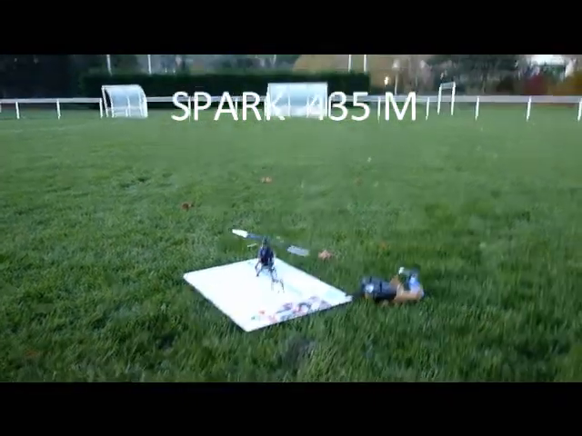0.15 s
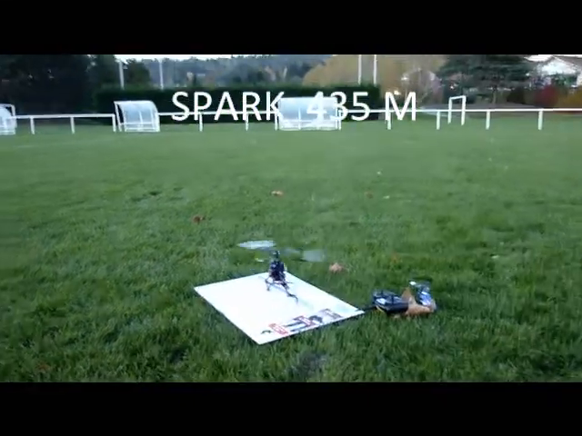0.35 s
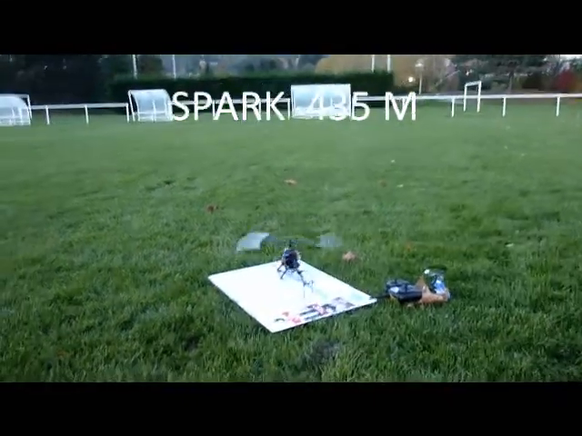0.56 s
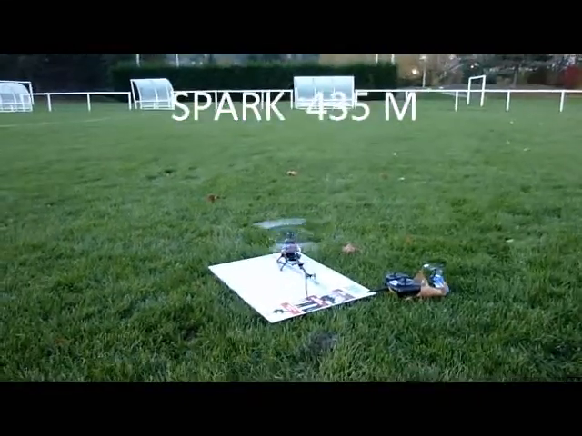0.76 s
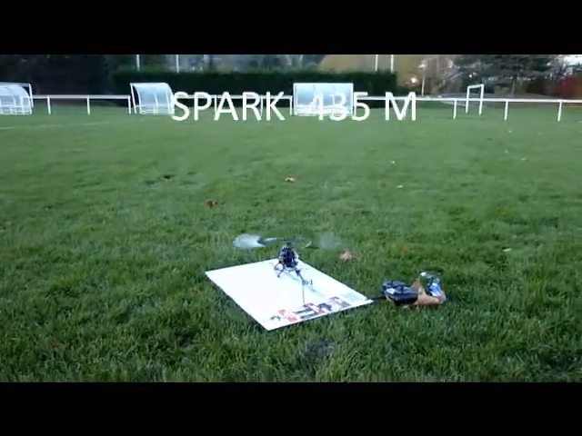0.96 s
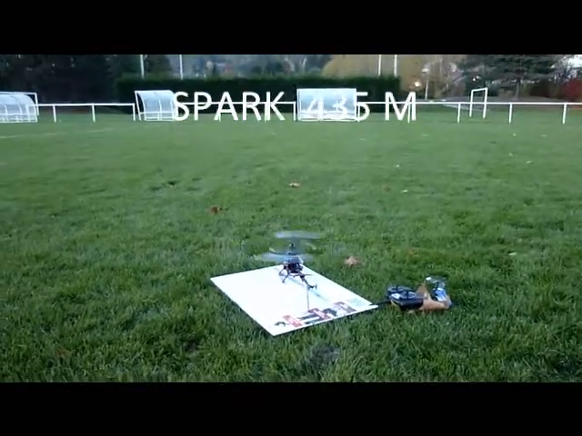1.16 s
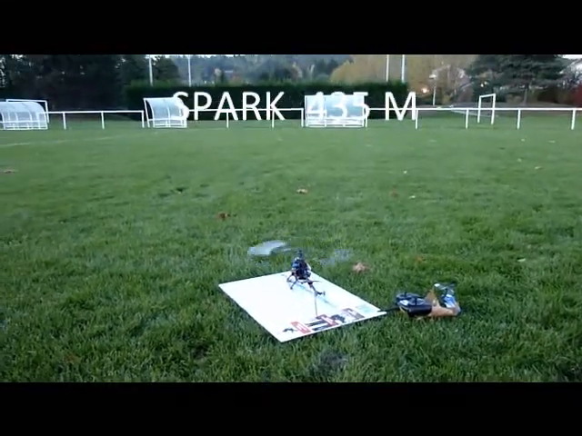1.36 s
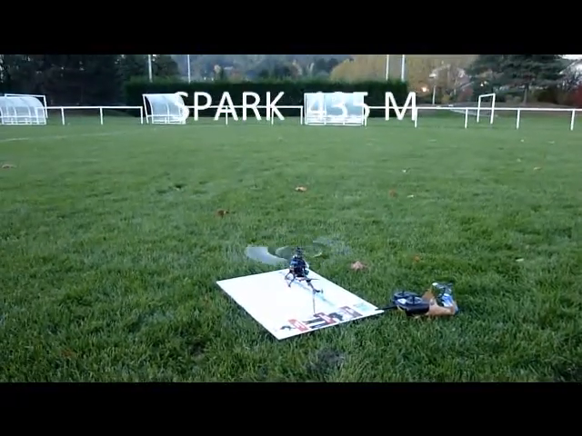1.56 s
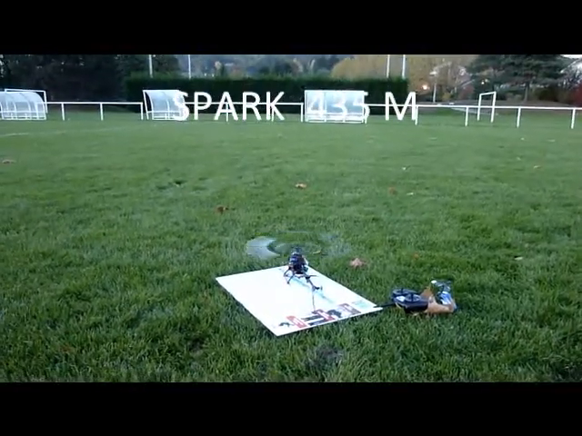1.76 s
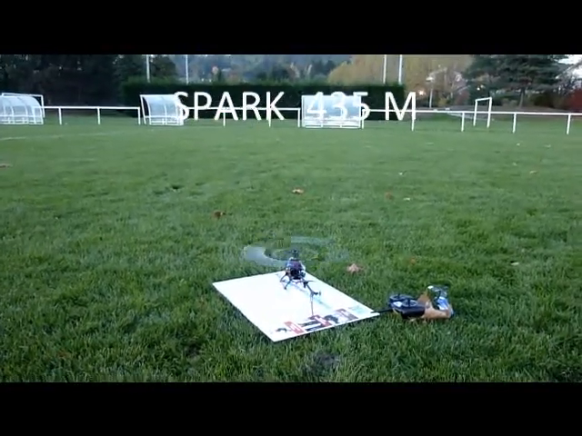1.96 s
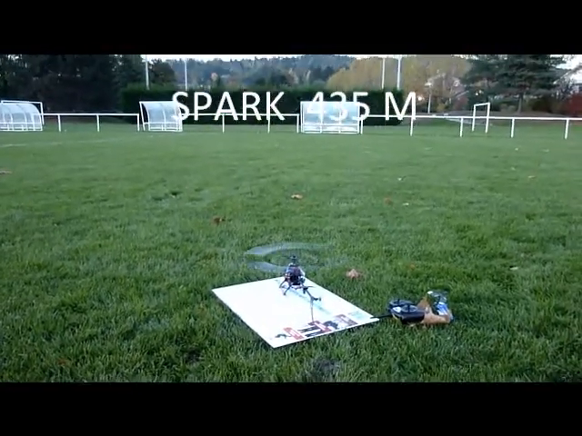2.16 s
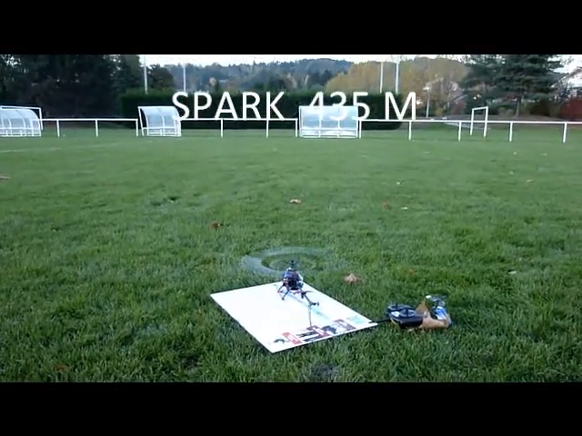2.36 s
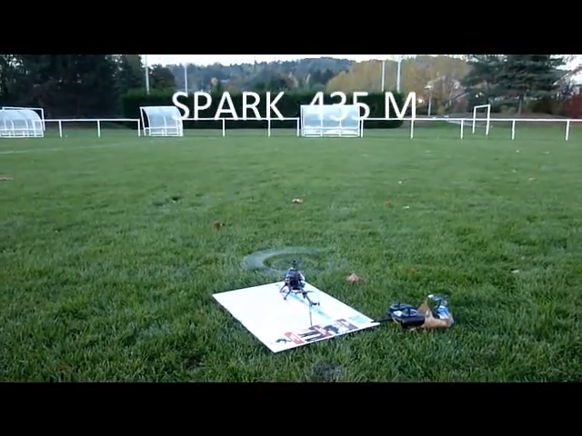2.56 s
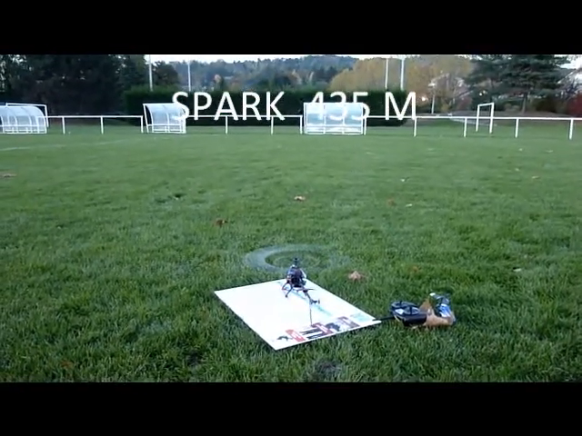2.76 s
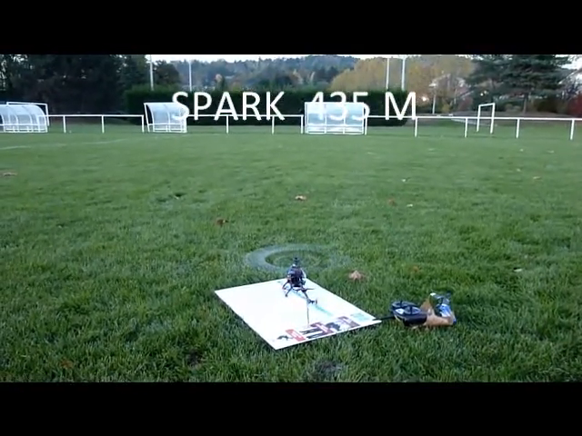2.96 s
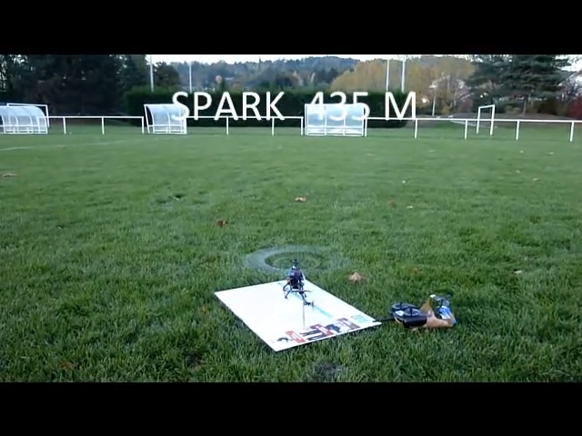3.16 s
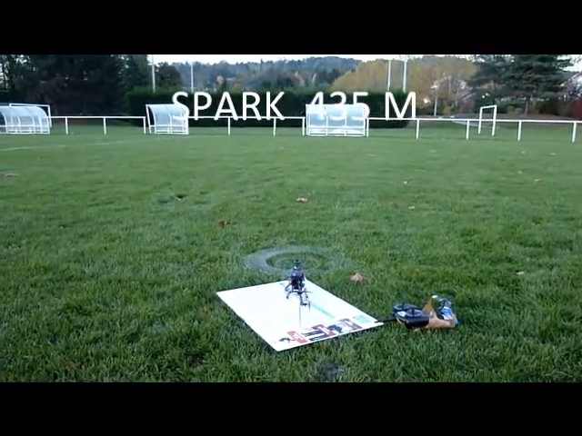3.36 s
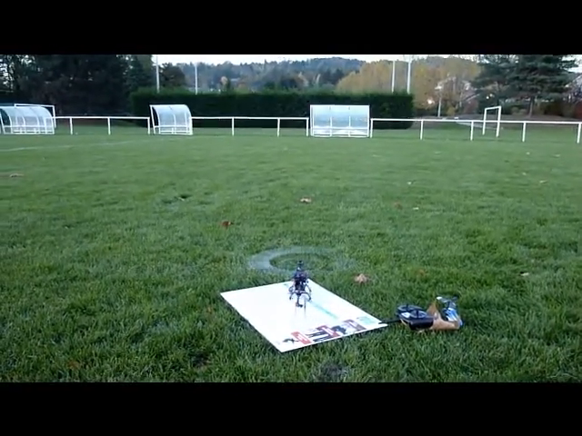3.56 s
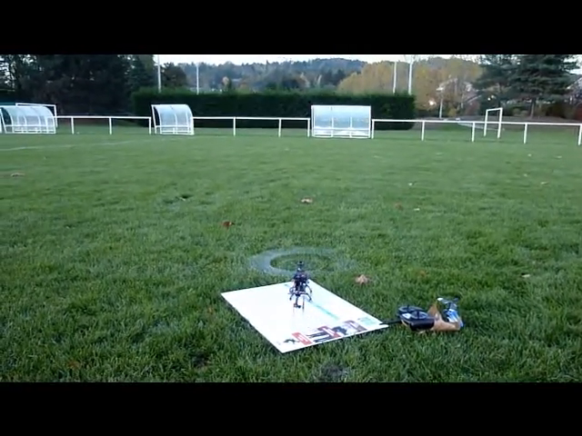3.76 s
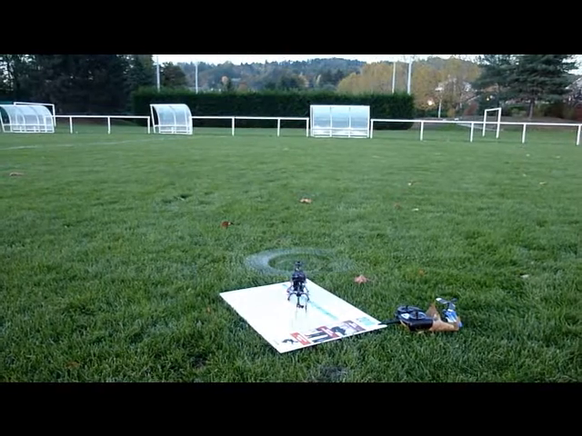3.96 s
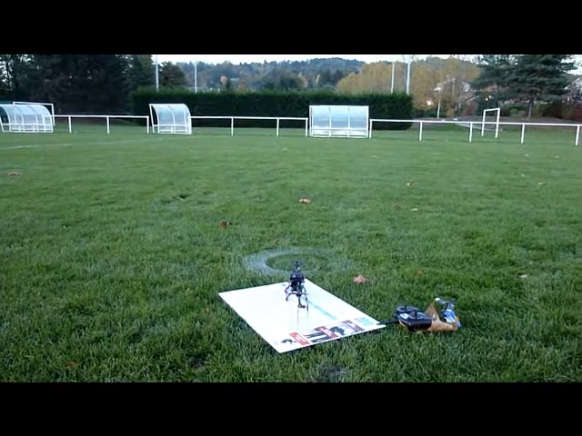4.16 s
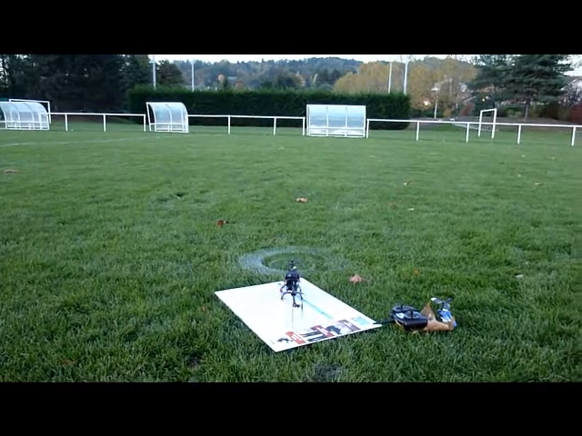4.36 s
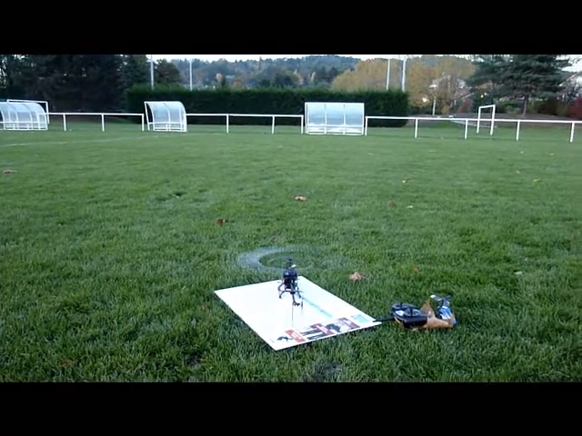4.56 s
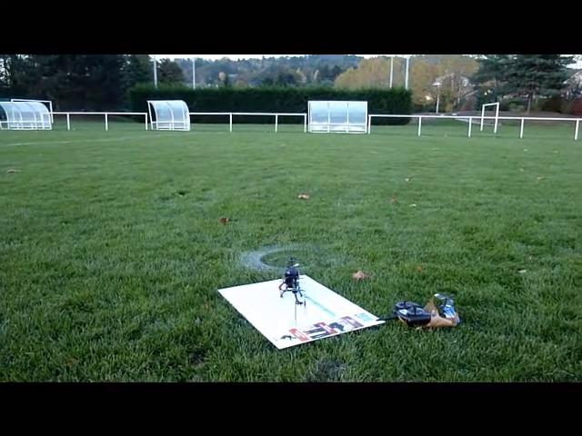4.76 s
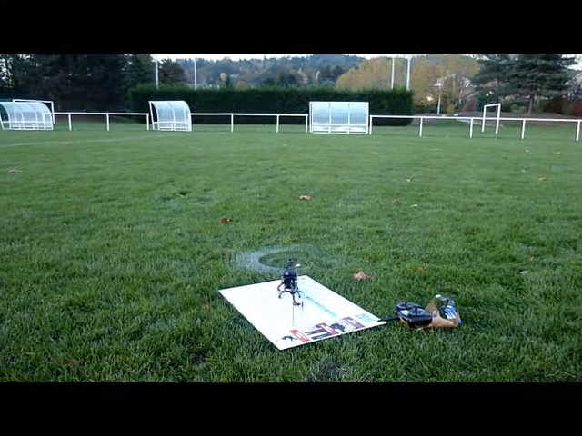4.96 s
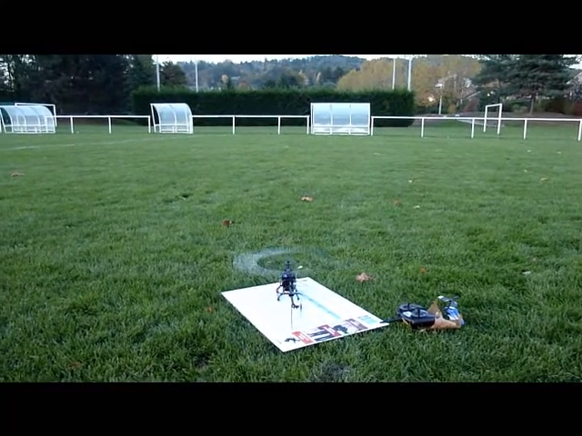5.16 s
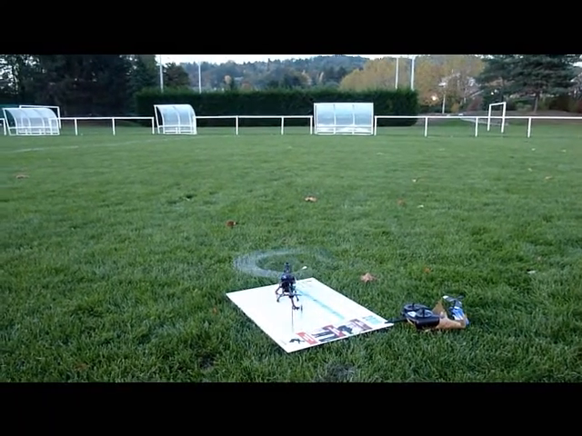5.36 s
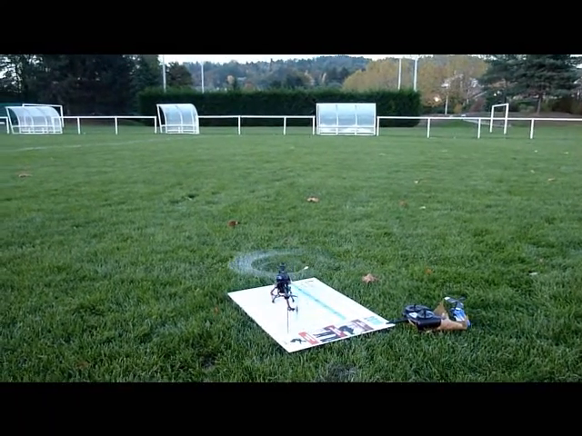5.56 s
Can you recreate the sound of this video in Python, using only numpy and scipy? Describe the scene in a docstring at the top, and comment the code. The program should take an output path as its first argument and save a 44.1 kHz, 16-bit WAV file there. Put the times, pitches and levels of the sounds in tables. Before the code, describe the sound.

In an open grassy field with faint traffic far off, a small electric model helicopter starts on a board. Tiny ticks and loose dry knocks come first, then a low gear whine wavers and climbs. Thin electronic tones slide downwards and fade around two seconds. The whine swells through resonances into a piercing, raspy pitch with fluttering blade swish, still rising at the end. One camera microphone a few steps away, narrow band, no deep bass.

```python
"""Small electric helicopter spooling up

It stands on a board in a field, a few steps from a camera whose single microphone hears it all.
The speed controller ticks and sings downwards while the pinion's whine climbs through the gearbox's resonances.
Gears rasp, motor and bearings sizzle, and the two blades swish, each following one motor speed; traffic passes far off.
The camera cuts two notches and keeps a narrow band."""
import sys
import numpy as np
from scipy import signal
from scipy.fft import rfft, irfft, next_fast_len
from scipy.io import wavfile
from scipy.ndimage import uniform_filter1d, map_coordinates

SR = 44100
rng = np.random.default_rng(int(sys.argv[2]) if len(sys.argv) > 2 else 0)


def dump(signal):
    """Clip the signal to [-1, 1] and save it as 16-bit WAV at the path in sys.argv[1]."""
    limited = np.clip(np.atleast_2d(signal).T, -1, 1)
    pcm = np.round(limited * 32767).astype(np.int16)
    wavfile.write(sys.argv[1], SR, pcm)


N = 251370
TIME = np.arange(N) / SR

# Far traffic's rumble and drone. Each row: frequency in Hz, relative level in dB.
TRAFFIC_SPECTRUM = [(20, -55.5), (40, -39.5), (70, -16.5), (110, -8.5), (160, 1.5), (280, 0), (360, -10),
                    (600, -16), (1500, -39)]
# Tyre rush across the field. Each row: frequency in Hz, relative level in dB.
TYRE_SPECTRUM = [(150, -31.5), (380, -10.5), (600, -7), (1000, 3), (1300, 0), (1900, -7.5), (2400, -7),
                 (3300, -19), (4200, -14), (6000, -37), (8000, -43)]
# Air torn by the blades. Each row: frequency in Hz, relative level in dB.
WASH_SPECTRUM = [(100, -30), (350, -23.5), (460, 0), (570, 6), (700, 4), (820, -18.5), (1050, 5.5),
                 (1350, -16), (1650, 1.5), (2000, -21), (4000, -35.5)]
# Hiss of sliding gear teeth. Each row: frequency in Hz, relative level in dB.
RASP_SPECTRUM = [(300, -24), (1000, -8.5), (1600, -12.5), (2000, -5), (2500, -9.5), (3000, 4.5),
                 (3500, 5.5), (4100, 3), (4550, 8), (4900, -5.5), (5600, -8.5), (8000, -36.5)]
# Hiss of the motor and bearings. Each row: frequency in Hz, relative level in dB.
SIZZLE_SPECTRUM = [(4000, -26), (5300, -9), (5650, -8.5), (5900, 6.5), (6100, 7), (6500, 3), (6900, -1.5),
                   (7200, -6.5), (7600, -14), (7900, -44)]
# Rise and fall of that hiss. Each row: time in seconds, level in dB.
SIZZLE_LEVEL = [(0.08, -68.5), (0.2, -49.5), (0.65, -43), (0.88, -51), (0.94, -43), (2.0, -44), (3.3, -40),
                (4.1, -37), (4.7, -38), (5.2, -48)]
# Current kicks in the windings. Each row: start in seconds, relative level in dB.
KICKS = [(0.105, -36.5), (0.1278, -33.5), (0.1672, -33.5), (0.172, -33), (0.18, -48.5), (0.193, -42),
         (0.9197, -26)]
# Knocks from slack in the drive and blade grips. Each row: start in seconds, relative peak level in dB.
KNOCKS = [(0.321, -32), (0.556, -34), (0.585, -23), (0.597, -32), (0.667, -30), (0.695, -33), (0.719, -27),
          (1.035, -34), (1.087, -32)]
# What a knock rings with. Each row: frequency in Hz, mean relative level in dB, 60 dB decay time in seconds.
CHASSIS_MODES = [(592, 2, 0.036), (720, 0, 0.012), (900, 2, 0.029), (1500, -7, .012), (2280, -11.5, 0.0085)]
# How well the frame radiates. Each row: frequency in Hz, gain in dB.
FRAME_RADIATION = [(250, -18.5), (440, 1), (560, -1.5), (790, 3), (1080, 5), (1650, -3.5), (2000, -7),
                   (2500, -3.5), (3700, -4.5), (4200, 3), (4500, 6.5), (4850, -6), (5300, -8.5),
                   (6100, 4.5), (6850, 3), (7800, -21)]
# How well the motor's can radiates. Each row: frequency in Hz, gain in dB.
CAN_RADIATION = [(4500, -38.5), (5300, -19), (5800, 1.5), (6600, 1), (7300, -1), (7700, -13.5)]
# Tones beating below the switching frequency. Each row: multiple of the motor turn, relative level in dB.
SIDEBANDS = [(9, -17.5), (12, -29), (15, -20), (17, -13), (18, 5), (19, -11.5), (21, -8), (24, -11),
             (25, -22), (26, -18.5), (27, 0), (30, -7.5)]
# Motor speed before smoothing. Each row: time in seconds, speed in motor turns a second.
MOTOR_SPEED = [(0.0, 3.0), (0.09, 4.7), (0.47, 32.1), (0.61, 48.7), (0.72, 50.8), (0.9, 65.7), (0.99, 60.2),
               (1.14, 66.0), (1.33, 64.2), (1.6, 67.5), (1.81, 80.1), (2.26, 123.8), (2.46, 135.2),
               (2.78, 147.7), (3.3, 169.9), (3.71, 190.2), (3.97, 210.6), (4.12, 218.9), (4.39, 224.4),
               (4.7, 242.4), (5.12, 255.2), (5.7, 266.0)]
# Shaft vibration. Each row: multiple of the motor turn, relative level in dB.
SHAFT_ORDERS = [(2, -57.5), (3, -57), (4, -64.5), (5, -73), (6, -64), (7, -71.5), (8, -69), (9, -62),
                (10, -55), (11, -51), (12, -48), (14, -46), (15, -55.5), (16, -49), (17, -77.5), (18, -48),
                (19, -50.5), (20, -52.5), (21, -54.5), (22, -61), (23, -51), (24, -58), (25, -47.5),
                (27, -50), (28, -47.5), (29, -49), (30, -54.5), (31, -56.5), (32, -52.5), (33, -54),
                (34, -59), (35, -58), (36, -49), (37, -61), (38, -48.5), (39, -51), (40, -47), (42, -59.5)]
# Tail drive gears. Each row: multiple of the motor turn, relative level in dB.
TAIL_ORDERS = [(5.777, -55.5), (6.13, -58.5), (11.2, -56), (11.555, -42.5), (12.645, -45), (13.355, -46.5),
               (14.8, -53.5), (16.13, -59.5), (17.33, -61)]
# Resonances where the whine swells. Each row: centre in Hz, width at half amplitude in Hz, peak gain in dB.
GEARBOX_RESONANCES = [(640, 220, -47), (1040, 230, -42.5), (1650, 250, -39.5), (2453, 280, -38.5),
                      (2760, 440, -38), (3105, 260, -35), (3577, 100, -34.5), (4045, 306, -23.5),
                      (4470, 370, -21.5), (5410, 330, -25), (5980, 480, -23.5), (6600, 660, -19.5)]
# Harmonics of the pinion's tooth rate. Each row: multiple, relative level in dB, phase smear in cycles.
TOOTH_HARMONICS = [(1, 0.5, 0.037), (2, -11, 0.036), (3, -26.5, 0.27), (4, -28, 0.34)]
# Notches in the camera's sound. Each row: centre in Hz, width in Hz.
CAMERA_NOTCHES = [(3000, 990), (5230, 480)]

PINION_TEETH, MAIN_GEAR_TEETH, TAIL_RATIO = 13, 130, 0.355
SWITCH_HZ, CAMERA_RATE_HZ, TOP_HZ = 7813, 16000, 7900
# Motor turns a second: the reference, where the teeth begin to run steadily, where the frame begins to shake.
FULL_SPEED, RATTLE_UNTIL, SHAKE_FROM = 250, 126, 132
# The rasp grows with speed, then eases from EASE_S on.
RASP_DB, RASP_DB_PER_OCTAVE, EASE_S, EASE_DB_PER_S = -38.5, 7, 3.6, 2
# The controller's song swells to a peak, then sinks away.
SONG_DB, SONG_PEAK_S, SONG_SWELL_DB_PER_S, SONG_DROP_DB, SONG_RELEASE_S = -43, 2.067, 8, 21, 0.058
# The blades take on pitch and bite the air, then the wash settles.
WASH_DB, BITE_S, BITE_ATTACK_S, BITE_DB, BITE_SETTLE_S = -46, 4.53, 0.13, 4, 1.1
# Far traffic: levels when nearest, moment when nearest, times to cover its own distance.
RUMBLE_DB, DRONE_DB, NEAREST_S, RUMBLE_PASS_S, DRONE_PASS_S = -51.5, -55, 2, 2.02, 0.87


def amp(db):
    """Decibels to gain."""
    return np.exp(np.asarray(db) * (np.log(10) / 20))


def unit(x):
    """Scale to rms 1."""
    return x / np.sqrt(np.mean(x ** 2) + 1e-20)


def along(points, hz):
    """Gain read from (Hz, dB) points on a log frequency axis."""
    f, db = np.transpose(points)
    return amp(np.interp(np.log(hz + 1), np.log(f), db))


def curve(rows):
    """One value per sample from (seconds, value) rows."""
    seconds, values = np.transpose(rows)
    return np.interp(TIME, seconds, values)


def since(start_s):
    """Seconds since a moment, zero before it."""
    return np.maximum(TIME - start_s, 0)


def wobble(rate):
    """A smooth random curve, rate knots a second."""
    knots = rng.standard_normal(int(N * rate / SR) + 4)
    coarse = TIME[::32]
    return np.interp(TIME, coarse, map_coordinates(knots, [coarse * rate]))


def filtered(x, response):
    """x shaped by a response of frequency."""
    size = next_fast_len(N + SR // 2)
    hz = np.fft.rfftfreq(size, 1 / SR)
    return irfft(rfft(x, size) * response(hz), size)[:N]


def noise(spectrum):
    """Coloured noise of rms 1."""
    return unit(filtered(rng.standard_normal(N), lambda hz: along(spectrum, hz)))


def tone(cycles):
    """A sine of rms 1 with a random starting phase."""
    fraction = (cycles - np.floor(cycles)).astype(np.float32)
    return np.sin(2 * np.pi * (fraction + rng.random())) * np.sqrt(2)


def runout(turns, count):
    """A wheel's unevenness, repeating with each of its turns."""
    return unit(sum(tone(k * turns) for k in range(1, count + 1)))


def outdoors(tyres_db=-44.5, drone_hz=185):
    """Far traffic: steady tyre rush, and rumble and one droning engine that come near and recede."""
    def nearness(pass_s):
        return 1 / np.hypot(1, (TIME - NEAREST_S) / pass_s)

    tyres = amp(tyres_db + 1.2 * wobble(2.4)) * noise(TYRE_SPECTRUM)
    rumble = amp(RUMBLE_DB + 0.63 * wobble(3.6)) * nearness(RUMBLE_PASS_S) * noise(TRAFFIC_SPECTRUM)
    drone_level = amp(DRONE_DB + 1.5 * wobble(10)) * nearness(DRONE_PASS_S) ** 2.4
    drone = drone_level * tone(drone_hz * TIME + 0.11 * wobble(14))
    return tyres + rumble + drone


def start_up(kick_db=-4, kick_t60=0.014, crack_db=-3, crack_t60=0.033):
    """Current kicks tick in the motor, and the drive knocks as it takes up its slack."""
    out = np.zeros(N)
    t = np.arange(SR // 8) / SR
    tick = noise(SIZZLE_SPECTRUM)
    crack = noise(FRAME_RADIATION[:8] + [(4000, -32.5)])

    def piece(x):
        return np.roll(x, rng.integers(N))[:len(t)]

    for start_s, db in KICKS:
        out[round(start_s * SR):][:len(t)] += amp(db + kick_db - 60 * t / kick_t60) * piece(tick)
    for start_s, db in KNOCKS:
        knock = amp(crack_db - 60 * t / crack_t60) * piece(crack)
        for hz, mode_db, t60 in CHASSIS_MODES:
            decay = amp(mode_db + rng.normal(0, 2.2) - 60 * t / t60)  # each knock strikes the modes differently
            knock += decay * np.sin(2 * np.pi * hz * t)
        out[round(start_s * SR):][:len(t)] += amp(db + 1) * knock / np.abs(knock).max()
    # Such small parts radiate little bass.
    return signal.sosfilt(signal.butter(3, 350, "highpass", fs=SR, output="sos"), out)


def blades(speed, turns, swish=0.33, chop=0.11, buzz=0.17, gust_db=-0.1, half_speed=40):
    """Air torn by the two blades swells with each pass; the motor's shake makes it buzz."""
    attack = np.minimum(since(BITE_S) / BITE_ATTACK_S, 1)
    bite = attack * np.exp(-since(BITE_S + BITE_ATTACK_S) / BITE_SETTLE_S)
    level = amp(WASH_DB + BITE_DB * bite + gust_db * wobble(28))
    rotor = turns * PINION_TEETH / MAIN_GEAR_TEETH
    passing = unit(1 + swish * runout(rotor, count=3) + chop * tone(2 * rotor) + buzz * tone(turns))
    return level * speed / (speed + half_speed) * passing * noise(WASH_SPECTRUM)


def friction(speed, turns, motor_pulsing=0.046, rotor_pulsing=0.082):
    """Sliding teeth and bearings hiss, pulsing with the turns of motor and rotor."""
    octaves = np.log2(speed / FULL_SPEED)
    rasp_db = RASP_DB + RASP_DB_PER_OCTAVE * octaves - EASE_DB_PER_S * since(EASE_S)
    rasp = amp(rasp_db) * noise(RASP_SPECTRUM)
    sizzle = amp(curve(SIZZLE_LEVEL)) * noise(SIZZLE_SPECTRUM)
    rotor = turns * PINION_TEETH / MAIN_GEAR_TEETH
    pulse = unit(1 + motor_pulsing * runout(turns, count=2) + rotor_pulsing * runout(rotor, count=3))
    return pulse * (rasp + sizzle)


def controller(speed, turns, flutter_db=1.0):
    """The chopped motor current beats with the passing magnets: tones fall as the motor speeds up."""
    swell_db = SONG_SWELL_DB_PER_S * np.minimum(TIME - SONG_PEAK_S, 0)
    release_db = SONG_DROP_DB * (1 - np.exp(-since(SONG_PEAK_S) / SONG_RELEASE_S))
    song = np.zeros(N)
    for multiple, db in SIDEBANDS:
        radiation = along(CAN_RADIATION, np.abs(SWITCH_HZ - multiple * speed))
        song += amp(db + flutter_db * wobble(9.9)) * radiation * tone(SWITCH_HZ * TIME - multiple * turns)
    turning = speed ** 2 / (speed ** 2 + 20 ** 2)  # beats fade as the magnets near a standstill
    carrier = amp(-75 + 3 * wobble(9)) * tone(SWITCH_HZ * TIME)
    powered = TIME > KICKS[0][0]  # the chopping starts with the first kick
    return powered * (amp(SONG_DB + swell_db - release_db) * turning * song + carrier)


def gearbox(hz):
    """Gain of the gearbox's resonances, summed in power, for a tone of this pitch."""
    power = 0
    for centre, width, db in GEARBOX_RESONANCES:
        power = power + (amp(db) / (1 + (2 * (hz - centre) / width) ** 2)) ** 2
    return np.sqrt(power)


def gears(speed, turns, uneven=0.18, tail_sway=0.042, rattle=0.21, waver_db=1.0, flutter_db=3.0, folded_db=-55):
    """Tooth mesh and shaft orders, swayed by the uneven main gear and the tail shaft."""
    rotor = turns * PINION_TEETH / MAIN_GEAR_TEETH

    def sway():
        return 1 + uneven * runout(rotor, count=5) + tail_sway * tone(TAIL_RATIO * turns)

    # Lightly loaded teeth rattle in their backlash; speed steadies them.
    slack = rattle * wobble(130) / (1 + (speed / RATTLE_UNTIL) ** 4)
    tremor = wobble(260)
    out = np.zeros(N)
    for multiple, db, smear in TOOTH_HARMONICS:
        level = amp(db + waver_db * wobble(45)) * gearbox(multiple * PINION_TEETH * speed)
        out += level * sway() * tone(multiple * PINION_TEETH * turns + slack + smear * wobble(260))
    # The shaft shakes the frame much more once it is up to speed.
    shake = sway() * speed / FULL_SPEED / (1 + (SHAKE_FROM / speed) ** 6)
    for multiple, db in list(SHAFT_ORDERS) + TAIL_ORDERS:
        level = amp(db + flutter_db * wobble(9)) * along(FRAME_RADIATION, multiple * speed)
        # Uneven tooth contact roughens every order and smears the highest into rasp.
        smear = (0.04 + 0.23 * (multiple / 39) ** 5) * np.roll(tremor, rng.integers(N))
        out += level * shake * tone(multiple * turns + slack + smear)
    # The third mesh harmonic passes half the camera's sampling rate and folds back down.
    third_hz = 3 * PINION_TEETH * speed
    folded = tone(CAMERA_RATE_HZ * TIME - 3 * PINION_TEETH * turns + 0.1 * tremor)
    return out + amp(folded_db) * np.exp(-((third_hz - 8650) / 350) ** 2) * folded


def scene():
    """One motor speed, smoothed by the rotor's inertia, drives the running parts; one microphone hears it all."""
    speed = uniform_filter1d(np.maximum(curve(MOTOR_SPEED), 1), size=2646)  # 60 ms
    turns = np.cumsum(speed) / SR
    helicopter = start_up() + blades(speed, turns) + friction(speed, turns)
    helicopter += controller(speed, turns) + gears(speed, turns)
    return np.tile(outdoors() + helicopter, (2, 1))


def record(dry, low_cut_hz=45):
    """The camera drops the deep bass, cuts two notches and keeps nothing above its band limit."""
    def response(hz):
        gain = hz * hz / (hz * hz + low_cut_hz ** 2) * (hz < TOP_HZ)
        for centre, width in CAMERA_NOTCHES:
            detuning = centre * centre - hz * hz
            gain = gain * detuning / (detuning + 1j * hz * width)
        return gain

    return np.array([filtered(channel, response) for channel in dry])


dry = scene()
out = record(dry)
dump(out)
```